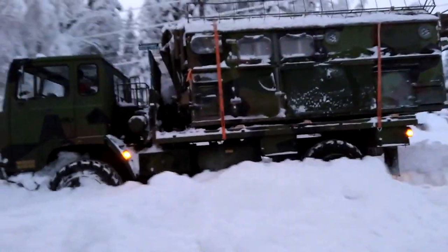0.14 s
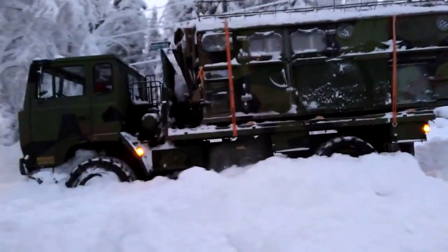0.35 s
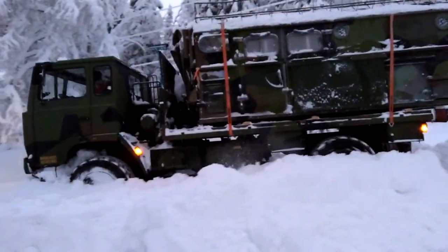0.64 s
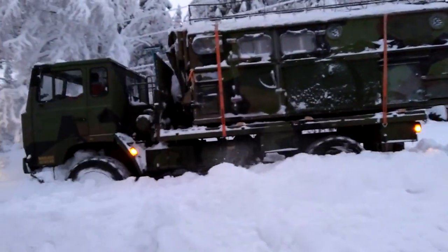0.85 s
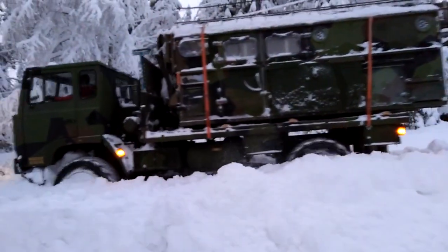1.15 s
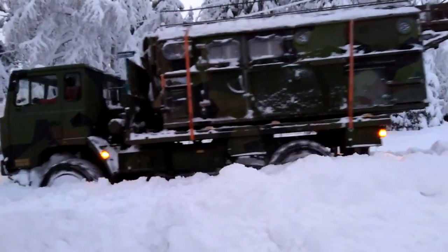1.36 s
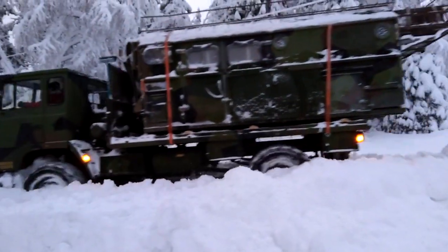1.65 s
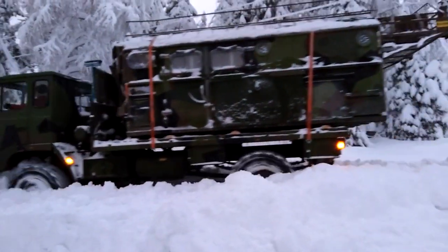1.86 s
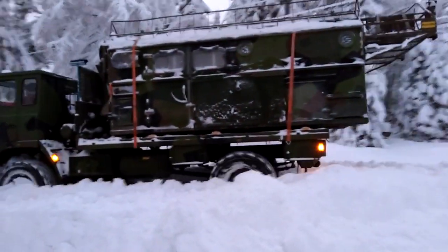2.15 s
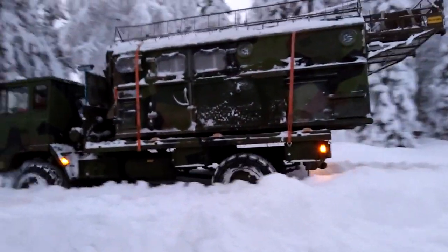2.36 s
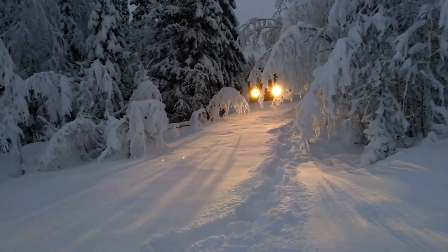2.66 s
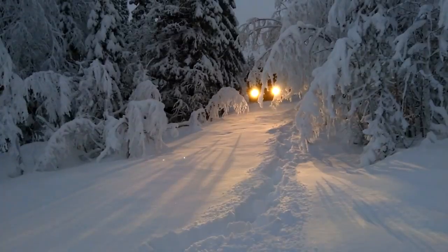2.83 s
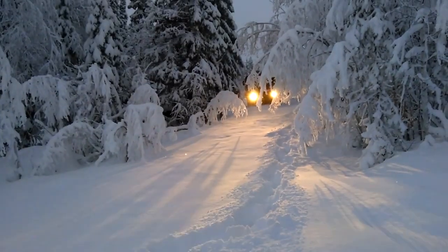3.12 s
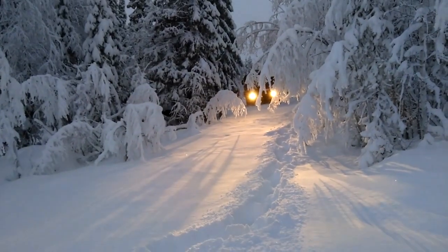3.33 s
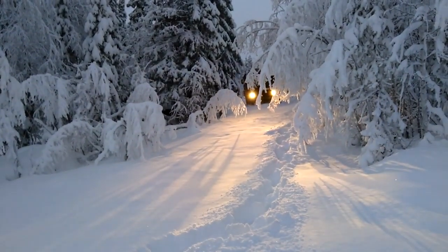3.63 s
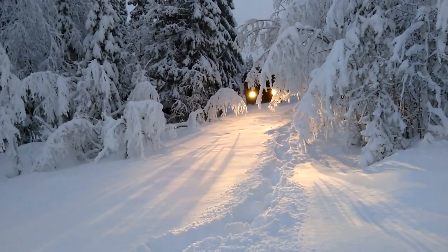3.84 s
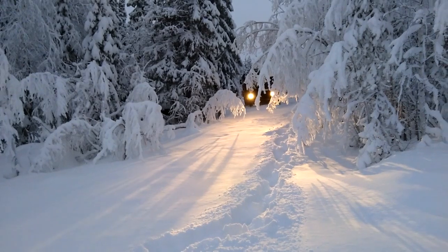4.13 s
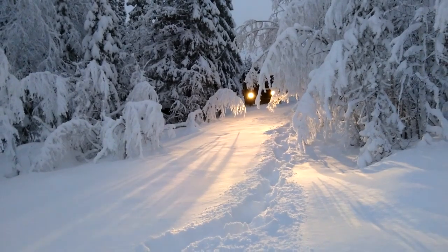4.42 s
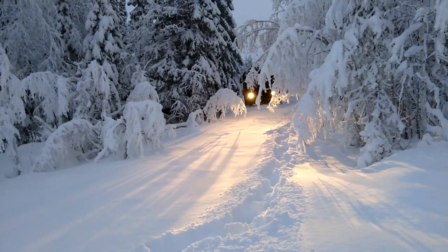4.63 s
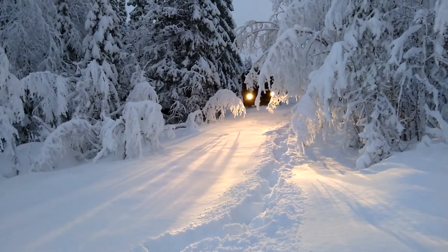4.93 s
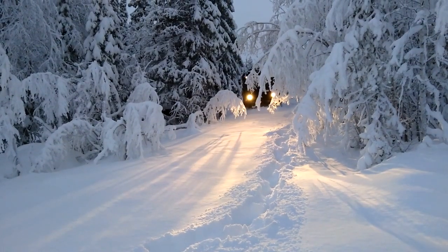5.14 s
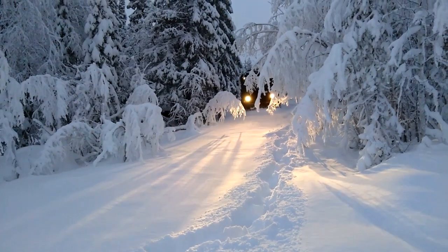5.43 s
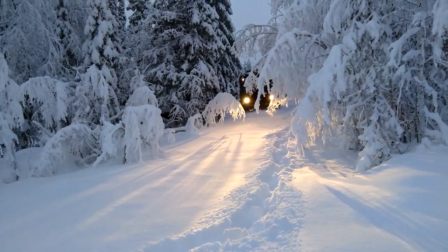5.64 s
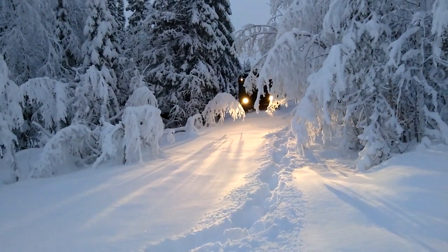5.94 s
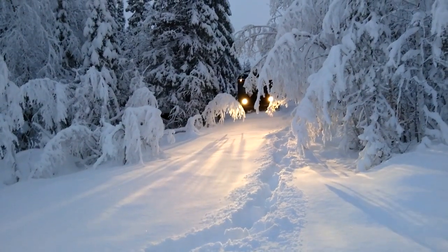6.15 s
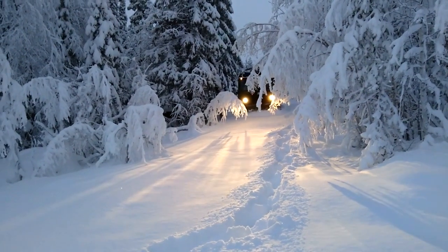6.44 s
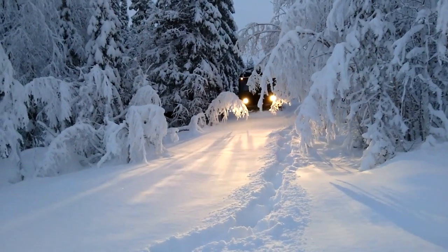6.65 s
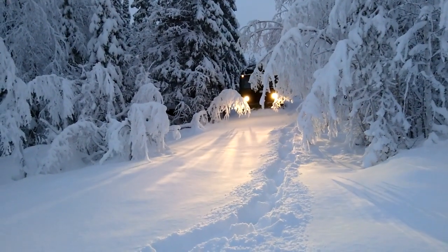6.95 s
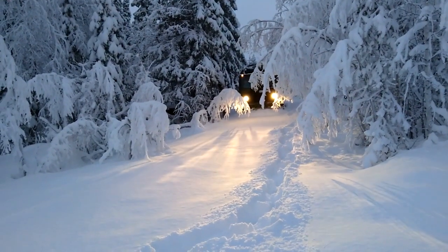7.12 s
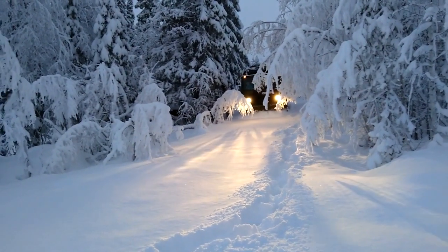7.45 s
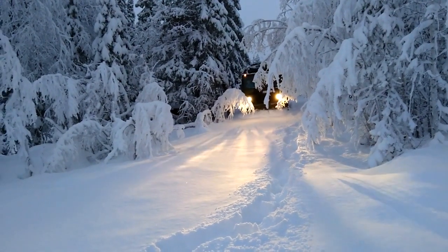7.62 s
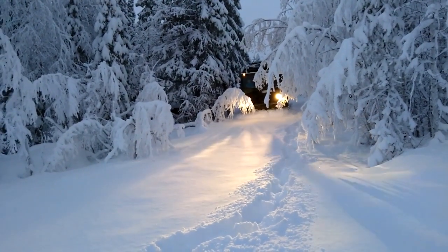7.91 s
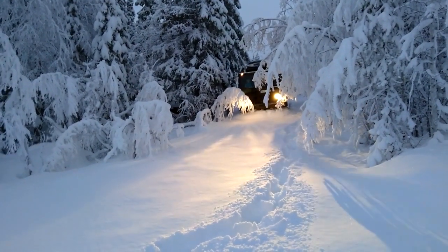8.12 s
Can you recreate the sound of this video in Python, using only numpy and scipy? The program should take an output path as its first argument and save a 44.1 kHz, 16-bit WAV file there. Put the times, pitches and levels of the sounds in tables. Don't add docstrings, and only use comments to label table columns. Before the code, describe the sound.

Outdoors in a snowy forest, a big six-cylinder diesel truck works hard a few metres from the microphone: deep exhaust boom, growling gears, hard metallic knocking and valve clatter, with a few bright chain clinks. Its revs rise, hold, then ease. After under three seconds the sound cuts at once to the truck far up the road, a weak, dull, steady idle that slowly gets louder.

```python
import sys
import numpy as np
from scipy import signal
from scipy.fft import rfft, irfft, next_fast_len
from scipy.io import wavfile
from scipy.ndimage import uniform_filter1d

SR = 44100
rng = np.random.default_rng(int(sys.argv[2]) if len(sys.argv) > 2 else 0)


def volts(x):
    e = np.asarray(x, float) / 20
    return 10 ** e


def output_pcm(signal):
    pcm = np.clip(np.atleast_2d(signal).T, -1, 1) * 32767
    wavfile.write(sys.argv[1], SR, np.round(pcm).astype(np.int16))


N = 365148
CUT_S = 2.6534
CYLINDERS = 6

ORDERS = [4, 5, 6, 7, 8, 9, 10, 11, 12, 13, 15, 18, 19, 21, 24, 26, 30, 32, 52, 62, 73]


def exhaust(t, cycle, order_db, start, shift, bend, sway_db):
    boom = np.zeros(len(t))
    for order, db in zip(ORDERS, order_db):
        level = volts(db + sway_db * wobble(t, 5.27))
        turns = order * (cycle + start + bend * order) + shift
        boom += level * np.sqrt(2) * np.cos(2 * np.pi * turns)
    return boom


# lowest and highest frequency in Hz, repeating share from 0 to 1,
# layer number (1 thud, 2 knock, 3 clatter).
PARTS = [
    (450, 770, .62, 1),
    (770, 1170, .84, 2),
    (1170, 1500, .65, 2),
    (1500, 2300, .18, 2),
    (2300, 16000, .06, 3),
]


def block(t, cycle, levels, rows, body, modes, patchy_db, growl_noise_db, **blow):
    grid = np.linspace(0, SR / 2, 4001)
    gain = volts(along(body, grid)) * resonances(modes, grid)

    def band(low, high):
        slopes = (1 + (low / (grid + 1)) ** 16) * (1 + (grid / high) ** 16)
        return lambda hz: np.interp(hz, grid, gain / np.sqrt(slopes))

    layers = np.zeros((4, 2, len(t)))
    growl = unit(rattle(cycle) + volts(growl_noise_db) * rng.standard_normal((2, len(t))))
    layers[1] += filtered(growl, band(20, PARTS[0][0]))
    for (low, high, share, layer), row in zip(PARTS, rows):
        struck = filtered(knocks(t, cycle, row, share, **blow), band(low, high))
        layers[layer] += struck * volts(patchy_db * wobble(t, 9.1))
    return sum(volts(levels[layer]) * unit(layers[layer]) for layer in (1, 2, 3))


def knocks(t, cycle, row, share, scatter_db, scatter_s, life, floor_db, rattle_db):
    degrees, db = firing(*row)
    turns = (np.arange(int(cycle[-1]) + 1)[:, None] + degrees / 720).ravel()
    luck = rng.standard_normal((len(turns), 2))
    at_s = np.interp(turns, cycle, t) - t[0] + scatter_s * luck[:, 0]
    at = (at_s * SR).astype(int).clip(0, len(t) - 1)
    size = volts(np.resize(db, len(turns)) + scatter_db * luck[:, 1]) * (turns < cycle[-1])
    burst = np.exp(-.5 * (np.arange(-SR // 60, SR // 60) / SR / life) ** 2)
    gate = volts(floor_db) + signal.oaconvolve(np.bincount(at, size, len(t)), burst, "same")
    signs = rng.choice([-1, 1], (2, len(db)))
    blows = np.array([np.bincount(at, np.sqrt(size) * np.resize(path, len(at)), len(t)) for path in signs])
    repeating = unit(unit(blows) + volts(rattle_db) * rattle(cycle))
    fresh = unit(gate * rng.standard_normal((2, len(t))))
    return np.sqrt(share) * repeating + np.sqrt(1 - share) * fresh


def firing(first, late, louder_db, swing_db, loudest):
    odd = np.arange(CYLINDERS) % 2
    degrees = first + np.arange(CYLINDERS) * 720 / CYLINDERS + late * odd
    swell_db = swing_db * np.cos(2 * np.pi * (degrees - loudest) / 720)
    db = 3.5 + louder_db * (odd - .5) + swell_db
    valve_degrees, valve_db = 58, -11
    return np.append(degrees, degrees + valve_degrees), np.append(db, db + valve_db)


def rattle(cycle, count=1500):
    slot = (cycle * count).astype(int)
    struck = np.diff(slot, prepend=0) > 0
    return unit(rng.standard_normal((2, count))[:, slot % count] * struck)


# start in seconds, peak level in dB.
CLINKS = [
    (0.3028, -24),
    (0.4943, -34),
    (0.602, -26),
    (1.7898, -28),
    (2.4189, -36),
    (2.4688, -35),
]


def chain(t):
    link_hz, width_hz, t60_s, link_db = 5400, 700, 0.052, -3
    ring = np.zeros(len(t))
    for start, db in CLINKS:
        ring += volts(db + link_db - 60 * (t - start).clip(0) / t60_s) * (t >= start)
    noise = rng.standard_normal((2, len(t)))
    return ring * unit(filtered(noise, lambda hz: np.exp(-.5 * ((hz - link_hz) / width_hz) ** 2)))


def rumble(t, spectrum):
    return unit(filtered(rng.standard_normal((2, len(t))), lambda hz: volts(along(spectrum, hz))))


def turned(t, sound, modes, turn):
    share = curve(turn, t).clip(0, 1)
    return (1 - share) * sound + share * filtered(sound, lambda hz: resonances(modes, hz))


def ports(pair, alike, lean, lead):
    def mix(hz):
        angle = np.arccos(np.clip(along(alike, hz), -1, 1)) / 2
        return np.array([np.cos(angle), np.sin(angle)])

    def half(hz):
        left = volts(along(lean, hz) / 2) * np.exp(.5j * curve(lead, hz))
        return np.array([left, 1 / left])

    mid, side = filtered(pair, mix)
    return filtered(np.array([mid + side, mid - side]), half)


# frequency in Hz, threshold as a ratio to the local level.
THIN = [(1000, .1), (4000, .55), (7000, .7), (14000, .75)]


def thinned(x, gaps, step_db=1.1):
    window = dict(window=("kaiser", 6), nperseg=2048, noverlap=1280)
    hz, _, z = signal.stft(x, SR, **window)
    power = np.sum(abs(z) ** 2, axis=0)
    local = uniform_filter1d(power, size=24, axis=0)
    strong = power > along(THIN, hz)[:, None] ** 2 * local
    band = (30 * np.log(1 + hz / 4000)).astype(int)
    luck = rng.standard_normal((2, band[-1] + 1, power.shape[1]))
    empty = unit(uniform_filter1d(luck[0], size=3, axis=1))[band] > along(gaps, hz)[:, None]
    uneven = volts(step_db * luck[1][band] * (hz > 2000)[:, None])
    keep = strong * ~empty * (hz < 14330)[:, None] * uneven
    return signal.istft(z * keep, SR, **window)[1][:, :x.shape[1]]


def resonances(modes, hz):
    return volts(sum(db / (1 + (2 * (hz - centre) / width) ** 2) for centre, width, db in modes))


def filtered(x, response):
    m = next_fast_len(x.shape[-1] + 8192)
    return irfft(rfft(x, m) * response(np.fft.rfftfreq(m, 1 / SR)), m)[..., :x.shape[-1]]


def unit(x):
    return x / np.sqrt(np.mean(x ** 2) + 1e-20)


def along(points, hz):
    f, v = np.transpose(points)
    return np.interp(np.log(hz + 1), np.log(f + 1), v)


def curve(points, x):
    return np.interp(x, *np.transpose(points))


def wobble(t, rate):
    knots = rng.standard_normal(int(len(t) * rate / SR) + 2)
    return np.interp((t - t[0]) * rate, np.arange(len(knots)), knots)


# time in seconds, firings per second.
NEAR_SPEED = [(0, 48.74), (.52, 54.78), (.88, 60.41), (1.23, 62.89), (1.63, 59.71), (2.12, 61.04),
              (2.5, 59.9), (2.65, 57.4)]
# time in seconds, level in dB.
NEAR_EFFORT = [(0, -1.5), (.3, 0), (.92, 2), (1.28, 0), (1.47, -2.5), (1.82, -1.3), (2.21, -3),
               (2.65, -5.5)]
# level in dB, share of the effort it follows.
NEAR_LAYERS = [
    (-22, 0.37),
    (-38.5, 0.65),
    (-33, 0.93),
    (-34, 1.05),
]
# level in dB, one per order.
NEAR_ORDER_DB = [-27, -22, 0, -23, -36, -18, -30, -28, -25, -37, -28, -42, -26, -33, -32, -32, -38, -36,
                 -36, -40, -40]
# frequency in Hz, density in dB per Hz.
NEAR_RUMBLE = [(20, -24), (45, 6), (90, 6), (200, -24), (300, -54)]
# first knock in crank degrees, lag of every second knock in degrees,
# its extra level in dB, swing once a cycle in dB, loudest angle in degrees.
NEAR_KNOCKS = [(40, 15, .6, .5, 620), (63, 4, 0, 1.5, 320), (80, -5, 0, 1.2, 230), (60, 10, -.5, 1, 130),
               (54, 0, 0, .7, 330)]
# frequency in Hz, density in dB per Hz.
NEAR_BODY = [(100, -27), (170, -7.5), (261, -1.5), (408, -10), (509, -5.5), (811, -4), (1560, -5),
             (1910, -3), (2090, -10), (2670, -21), (4170, -14.5), (6280, -22.5), (8000, -33.5),
             (11000, -36), (14500, -36.5)]
# frequency in Hz, width in Hz, level over the body in dB.
NEAR_MODES = [(432, 124, -6), (700, 230, 2), (847, 97, 2), (930, 92, -0.5), (1252, 28, -1),
              (1460, 110, 0.5), (1908, 142, 7.5), (2740, 98, -3.5), (2830, 77, 3), (3600, 210, -3),
              (7160, 370, -1.5), (7940, 370, -6.5), (332, 15, 3), (11340, 640, 3.5), (12800, 730, -9)]
# frequency in Hz, width in Hz, level in dB.
NEAR_SIDE_ON = [(938, 240, 9), (1247, 67, 8), (1706, 140, 7), (2870, 170, 7.5), (3490, 88, 7),
                (4360, 760, -4), (1880, 80, -0.5), (516, 61, 4.5), (810, 94, -1), (9500, 6000, 2),
                (700, 230, -2.5)]
# time in seconds, side-on share from 0 to 1.
NEAR_TURN = [(0, 0.34), (.4, 0.76), (.9, 0.77), (1.3, 0.48), (1.5, 0.44), (2.1, 0.06), (2.6, .05)]
# frequency in Hz, left-right likeness from 0 to 1.
NEAR_ALIKE = [(60, .999), (300, .985), (700, .96), (1400, .83), (2800, .6), (5500, .45), (7000, .5),
              (9000, .55), (14000, .35)]
# frequency in Hz, left minus right in dB.
NEAR_LEAN = [(60, 0.85), (110, 0.37), (200, -0.2), (380, 1.1), (700, -0.2), (1290, -2.5), (2380, 4.5),
             (4400, 0.6), (8120, -1), (15000, 0)]
# frequency in Hz, phase by which left leads in radians.
NEAR_LEAD = [(0, .06), (300, .2), (640, .6), (1200, 1.0), (1700, 2.4), (3600, 8), (6000, 9.7), (6400, 6.28),
             (16000, 6.28)]
# frequency in Hz, rarity of gaps in standard deviations.
NEAR_GAPS = [(1900, 4), (2150, 1.5), (2400, 4), (6500, 3), (7200, 1.2), (8100, .9), (9000, 1.6),
             (11500, 1.8), (12500, 1.1), (14000, 1)]


def near(t):
    speed, effort = curve(NEAR_SPEED, t), curve(NEAR_EFFORT, t)
    falter = -1 * np.exp(-.5 * ((t - 2.565) / 0.033) ** 2)
    cycle = np.cumsum(speed) / SR / CYLINDERS
    levels = [db + share * effort + falter for db, share in NEAR_LAYERS]
    pipe_hz, firing_db_per_hz, other_db_per_hz = 59.7, 0.39, -0.03
    order_db = []
    for order, db in zip(ORDERS, NEAR_ORDER_DB):
        slope = firing_db_per_hz if order == CYLINDERS else other_db_per_hz
        order_db.append(db + slope * (speed - pipe_hz))
    orders = exhaust(t, cycle, order_db, start=.935, shift=.82, bend=.315, sway_db=.4)
    boom = orders * [[1], [0]] + volts(-21) * rumble(t, NEAR_RUMBLE)
    metal = block(t, cycle, levels, NEAR_KNOCKS, NEAR_BODY, NEAR_MODES, patchy_db=.5, growl_noise_db=0,
                  scatter_db=1.1, scatter_s=.00003, life=.003, floor_db=6, rattle_db=0)
    metal = turned(t, metal, NEAR_SIDE_ON, NEAR_TURN) + chain(t)
    return thinned(ports(volts(levels[0]) * boom + metal, NEAR_ALIKE, NEAR_LEAN, NEAR_LEAD), NEAR_GAPS)


# time in seconds, firings per second.
FAR_SPEED = [(2.65, 48.66), (3.29, 49.28), (3.69, 49.34), (4.9, 48.63), (5.49, 47.8), (5.82, 47.05),
             (6.4, 48.04), (6.7, 47.54), (8.28, 48.06)]
# time in seconds, level in dB.
FAR_APPROACH = [(2.65, 0), (3.5, 1.7), (5.5, 2.5), (7.3, 5), (8.28, 6)]
# level in dB, share of the approach it follows.
FAR_LAYERS = [
    (-54, 0.98),
    (-54.5, 1.13),
    (-47.5, 0.44),
    (-55, 0.56),
]
# level in dB, one per order.
FAR_ORDER_DB = [-38, -13, 0, -16, -28, -12, -30, -24, -8, -22, -17, -25, -24, -27, -34, -34, -25, -34, -34,
                -19, -17]
# frequency in Hz, density in dB per Hz.
FAR_RUMBLE = [(20, -28), (45, -8), (90, 3), (200, -14.5), (300, -27)]
# first knock in crank degrees, lag of every second knock in degrees,
# its extra level in dB, swing once a cycle in dB, loudest angle in degrees.
FAR_KNOCKS = [(90, -8, 4, .5, 680), (80, -20, -4, 3, 540), (105, -4, 6, 8, 440), (80, -25, 2.5, .8, 680),
              (74, 2, 0, .7, 0)]
# frequency in Hz, density in dB per Hz.
FAR_BODY = [(100, -27), (170, -19), (385, -15.5), (580, -12), (739, -9.5), (977, -3.5), (1370, -18.5),
            (1500, -17), (1940, -17), (2480, -27), (3870, -28.5), (4930, -25.5), (6050, -33.5), (6890, -37),
            (14500, -59.5)]
# frequency in Hz, width in Hz, level over the body in dB.
FAR_MODES = [(477, 20, 5.5), (582, 50, 9), (918, 47, 3), (1004, 180, 4), (1340, 125, 11), (1715, 140, 7.5),
             (1957, 235, 8.5), (2380, 400, -4), (3303, 93, 6), (3870, 200, 5.5), (4400, 370, 3),
             (5940, 120, -5), (387, 34, -7.5)]
# frequency in Hz, width in Hz, level in dB.
FAR_SIDE_ON = [(1000, 460, 3.5), (1210, 39, 1.5), (1940, 740, -4.5), (730, 76, -5)]
# time in seconds, side-on share from 0 to 1.
FAR_TURN = [(2.7, 1), (5, 0.98), (6, 0.15), (8.2, .05)]
# frequency in Hz, left-right likeness from 0 to 1.
FAR_ALIKE = [(60, .99), (300, .96), (1000, .96), (2000, .8), (4400, .2), (5600, .2), (7500, .75),
             (14000, .93)]
# frequency in Hz, left minus right in dB.
FAR_LEAN = [(60, 1.1), (110, 2.5), (200, 0.5), (380, 1.5), (700, 0.8), (1290, 1.4), (2380, 2), (4400, 2),
            (8120, -1), (15000, 1)]
# frequency in Hz, phase by which left leads in radians.
FAR_LEAD = [(0, 0), (1100, -.2), (3000, -1.1), (6000, -2), (6400, 0), (16000, 0)]
# frequency in Hz, rarity of gaps in standard deviations.
FAR_GAPS = [(5850, 4), (6000, .5), (6250, .5), (6500, 1.6), (8200, 1.5), (10000, 1.4), (14000, 1.3)]


def far(t):
    speed, approach = curve(FAR_SPEED, t), curve(FAR_APPROACH, t)
    cycle = np.cumsum(speed) / SR / CYLINDERS
    levels = [db + share * approach for db, share in FAR_LAYERS]
    orders = exhaust(t, cycle, FAR_ORDER_DB, start=.13, shift=.02, bend=.15, sway_db=.5)
    boom = orders * [[1], [0]] + volts(-15) * rumble(t, FAR_RUMBLE)
    metal = block(t, cycle, levels, FAR_KNOCKS, FAR_BODY, FAR_MODES, patchy_db=.3, growl_noise_db=3,
                  scatter_db=.8, scatter_s=.00003, life=.003, floor_db=7.5, rattle_db=-9)
    metal = turned(t, metal, FAR_SIDE_ON, FAR_TURN)
    return thinned(ports(volts(levels[0]) * boom + metal, FAR_ALIKE, FAR_LEAN, FAR_LEAD), FAR_GAPS)


def scene():
    t, cut = np.arange(N) / SR, round(CUT_S * SR)
    close = near(np.arange(cut + 2000) / SR)[:, :cut]
    return np.concatenate([close, far(t[cut:])], axis=1)


def band_limit(x):
    return signal.sosfilt(signal.butter(12, 15640, fs=SR, output="sos"), x)


def record(dry):
    return band_limit(dry)


dry = scene()
out = record(dry)
output_pcm(out)
```